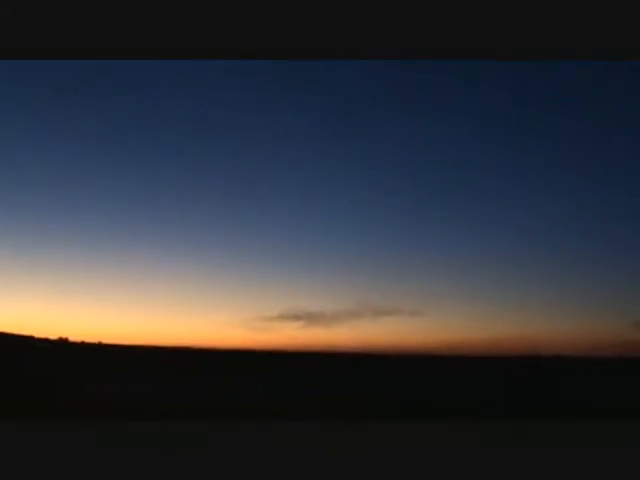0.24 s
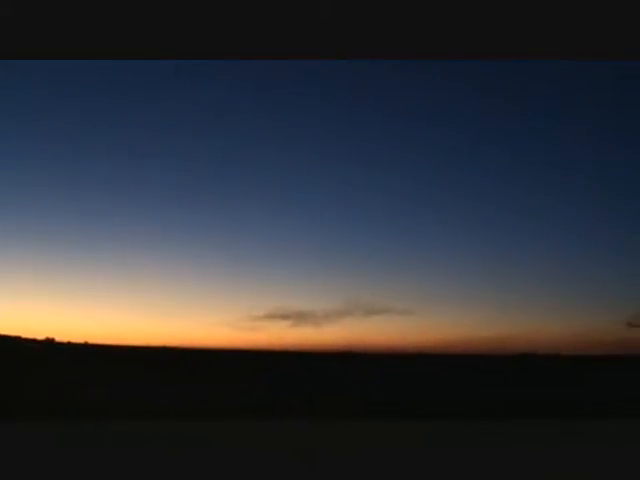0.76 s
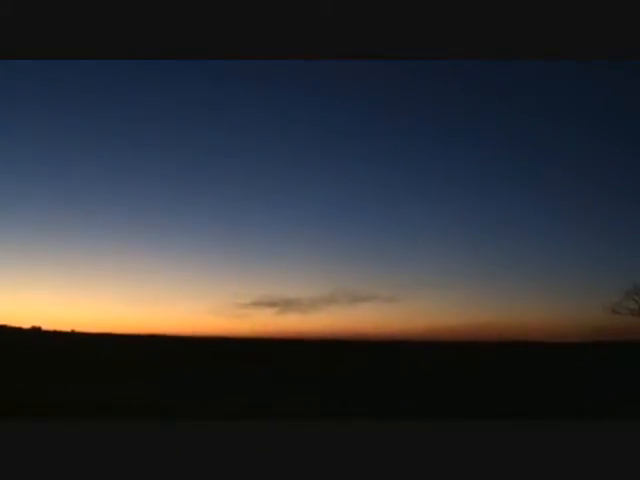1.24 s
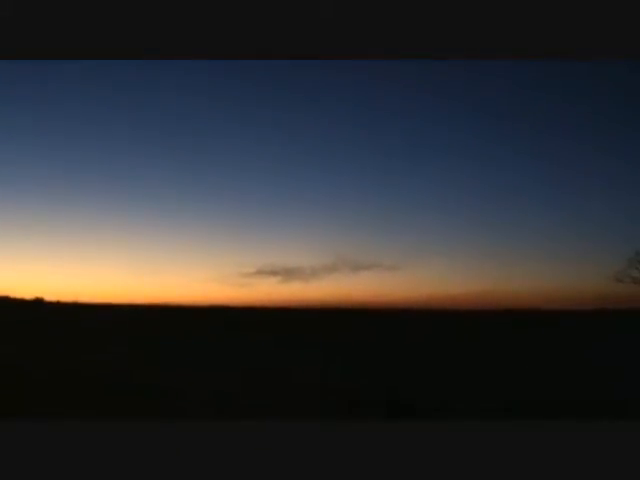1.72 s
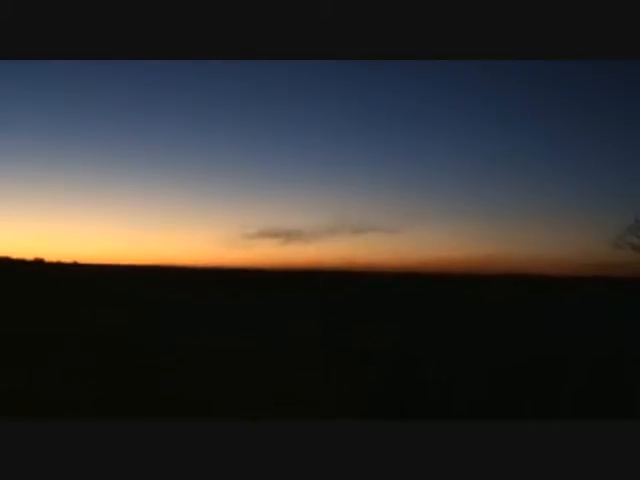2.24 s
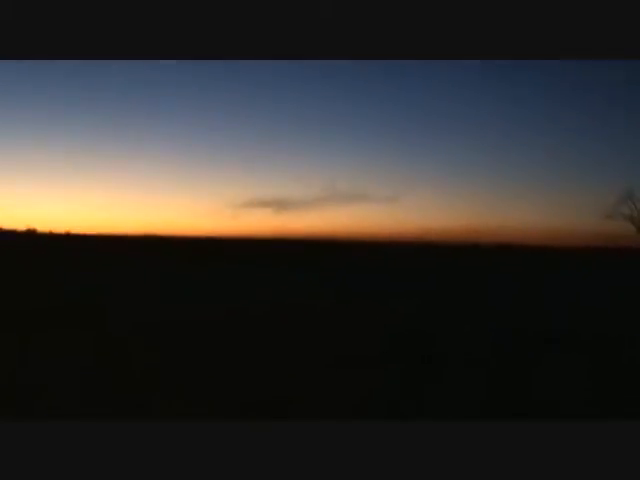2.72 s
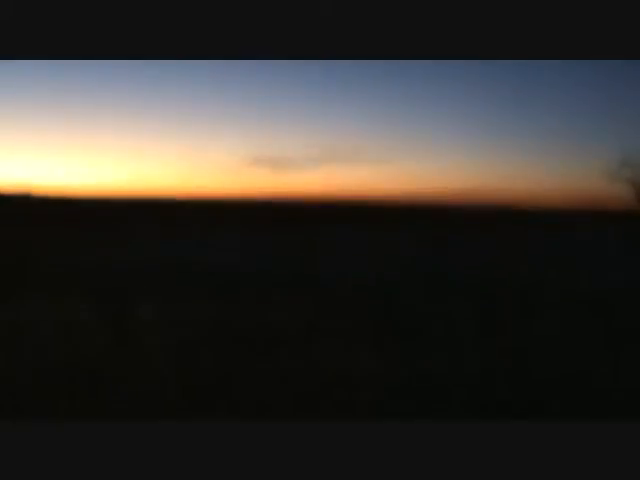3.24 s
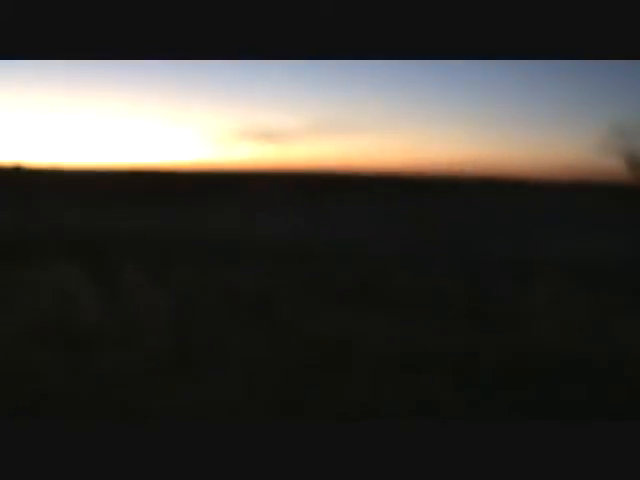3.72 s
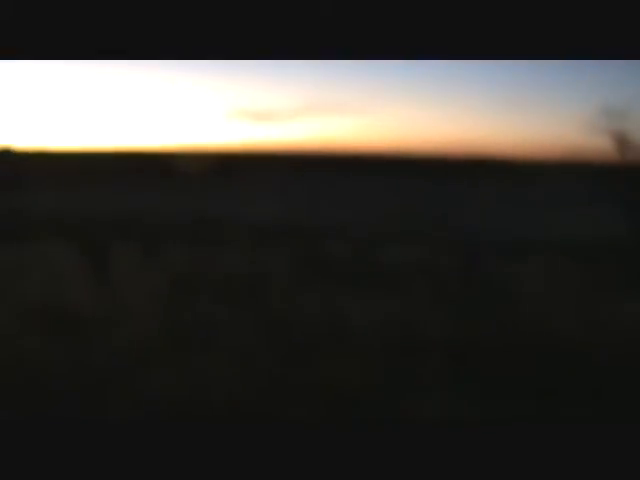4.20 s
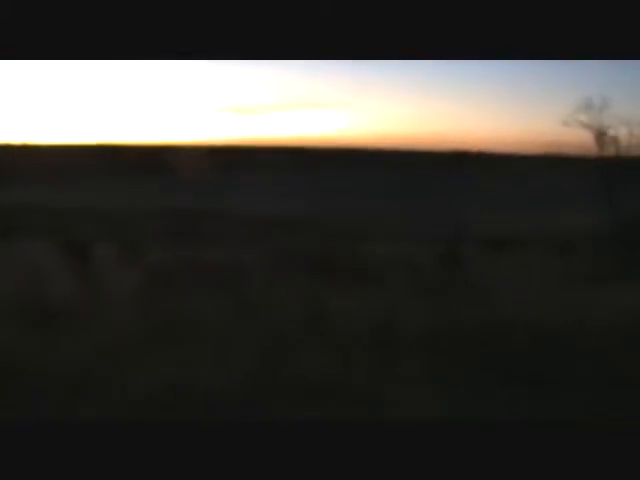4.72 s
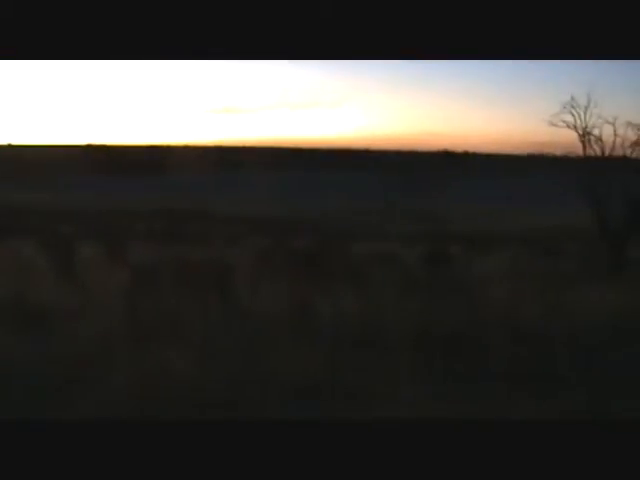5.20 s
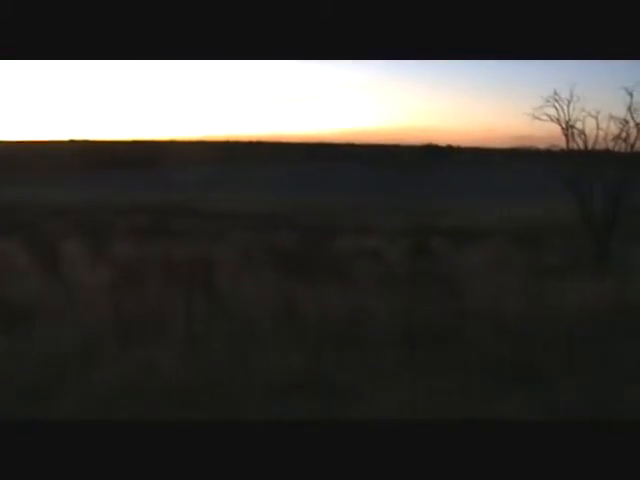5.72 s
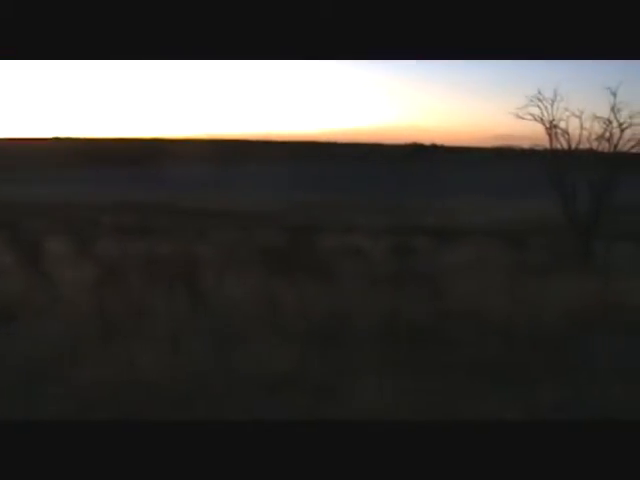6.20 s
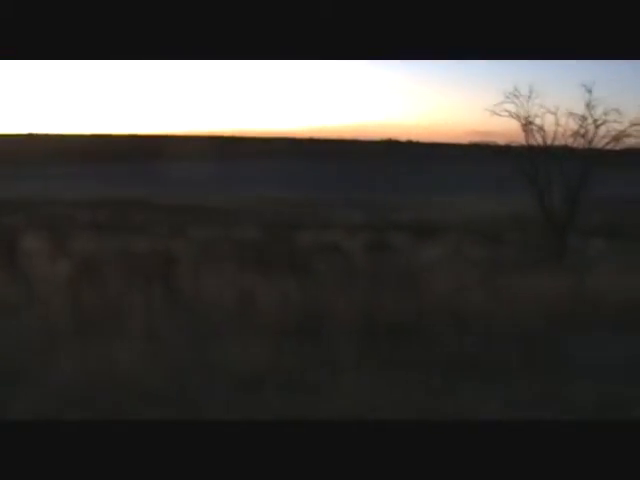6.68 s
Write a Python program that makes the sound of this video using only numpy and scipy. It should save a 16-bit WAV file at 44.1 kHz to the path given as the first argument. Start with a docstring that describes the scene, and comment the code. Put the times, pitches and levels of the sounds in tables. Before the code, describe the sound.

Close and distant geckos trade short, rattling chirp-like barks outdoors at dusk, the loudest on the left, with faint insects and quiet air behind.

```python
"""Barking geckos call from burrows on an open plain at dusk: three close, many further off.
Each bark is a quick run of 10-13 pulses ringing throat and burrow, then scattered by the ground.
Behind: bush crickets (stroke-modulated narrow resonance), air (shaped noise), a camera motor
(harmonics of its turn rate), handling bumps (noise swells) and short tones (gliding sines)."""
import sys
import numpy as np
from scipy import signal
from scipy.fft import rfft, irfft
from scipy.io import wavfile
from scipy.ndimage import uniform_filter1d

SR = 44100
rng = np.random.default_rng(int(sys.argv[2]) if len(sys.argv) > 2 else 0)


def pcm_store(signal):
    """Save signal as 16-bit PCM."""
    levels = np.round(np.clip(np.atleast_2d(signal), -1, 1) * 32767)
    wavfile.write(sys.argv[1], SR, levels.astype(np.int16).T)


N = 306495
TIME = np.arange(N) / SR


def undb(db):
    """Decibels to gain."""
    return 10 ** (np.asarray(db) / 20)


def unit(x):
    """Scale to rms 1."""
    return x / np.sqrt(np.mean(x ** 2))


def on_log(points, hz):
    """Read (f/Hz, value) points on a log-frequency axis."""
    f, value = np.transpose(points)
    return np.interp(np.log(np.maximum(hz, 1)), np.log(f), value)


def freqs(size):
    """Bin frequencies/Hz of a spectrum."""
    return np.arange(size // 2 + 1) * SR / size


def noise(gain):
    """Noise of rms 1 with the given gain per frequency bin."""
    return unit(irfft(rfft(rng.standard_normal(N)) * gain, N))


def band(centre_hz, width_hz):
    """Noise in a steep resonance."""
    f = freqs(N) + 1
    detune = (f * f - centre_hz * centre_hz) / (f * width_hz * 2)
    return noise(1 / (1 + detune ** 2 * 2))


def walk(rate_hz):
    """Slow random drift of rms near 1."""
    k = int(SR / rate_hz)
    steps = np.repeat(rng.standard_normal(N // k + 1), k)
    return unit(uniform_filter1d(steps, k)[:N])


def add(out, start_s, sound, pan_db):
    """Mix a sound into both channels; pan is left minus right."""
    i = max(int(start_s * SR), 0)
    part = sound[:max(N - i, 0)]
    out[:, i:i + len(part)] += undb(np.array([[pan_db], [-pan_db]]) / 2) * part


# hiss spectrum: f/Hz, relative density/dB
AIR_SPECTRUM = [(20, -36), (33, 0.5), (50, -6), (110, -5), (400, -4), (620, -7.5), (1000, -6), (2000, -7),
                (4000, -15), (7000, -16.5), (9500, -19.5), (11500, -21), (16000, -22.5)]
# left-right likeness of the hiss: f/Hz, correlation
AIR_LIKENESS = [(30, 1), (125, 0.91), (300, 0.5), (700, 0.04), (3000, 0.033), (8000, 0.49), (13000, 0.51)]
# rustle resonance: f/Hz, width/Hz
RUSTLE_BAND = (230, 240)


def air(level_db, rustle_db, unrest_db):
    """Even hiss, alike in both ears in the bass, with a low rustle that comes and goes."""
    f = freqs(N)
    gain = undb(on_log(AIR_SPECTRUM, f))
    alike = np.clip(on_log(AIR_LIKENESS, f), -1, 1)
    mid = irfft(rfft(rng.standard_normal(N)) * gain * np.sqrt(1 + alike), N)
    side = irfft(rfft(rng.standard_normal(N)) * gain * np.sqrt(1 - alike), N)
    hiss = undb(level_db) * unit(np.array([mid + side, mid - side]))
    shared, apart = band(*RUSTLE_BAND), band(*RUSTLE_BAND)
    rustle = shared + .5 * np.array([apart, -apart])
    return hiss + rustle * undb(rustle_db + unrest_db * walk(7))


MOTOR_TURN_HZ = 33.505
# motor lines, gaps interpolated: harmonic number, level/dB
MOTOR_LINES = [(22, -81), (24, -80), (27, -78), (29, -75), (30, -71), (31, -71), (33, -77), (34, -83),
               (36, -79), (37, -67.5), (38, -77), (39, -75), (40, -84), (44, -83)]


def motor(scatter_rad):
    """Camera motor ticks once a turn, so its harmonics throb together; speed wavers slightly."""
    order, db = np.transpose(MOTOR_LINES)
    turn = 2 * np.pi * np.cumsum(MOTOR_TURN_HZ * (1 + 0.00043 * walk(4.12))) / SR
    lines = 0
    for k in range(int(order[0]), int(order[-1]) + 1):
        phase = k * turn + scatter_rad * rng.standard_normal()
        lines = lines + undb(np.interp(k, order, db)) * np.cos(phase)
    return np.sqrt(2) * lines


TRILL_ATTACK_S, TRILL_RELEASE_S = 0.067, 0.47
# bush cricket trills: t/s, hold/s, level/dB, f/Hz
TRILLS = [(.95, .55, -64.5, 7920), (2.92, 0.68, -64.5, 8050), (4.0, 0.44, -62.5, 7980),
          (5.2, 0.75, -63, 7860), (6.4, 0.5, -63.5, 7930)]


def cricket(stroke_hz, width_hz, distant_db, distant_hz, distant_width_hz):
    """Wing strokes swell a narrow high resonance: trills build, hold, die over a distant shimmer."""
    strokes = 1 + .7 * np.cos(2 * np.pi * np.cumsum(stroke_hz * (1 + .002 * walk(3))) / SR)
    rasp = np.array([band(width_hz / 2, width_hz) + 1j * band(width_hz / 2, width_hz)
                     for _ in range(2)])
    voice = (rasp + 1) / np.sqrt(np.mean(np.abs(rasp + 1) ** 2))
    trills = 0
    for start, held, db, hz in TRILLS:
        age = np.maximum(TIME - start, 0)
        release = np.exp(-(np.maximum(age - held, 0) / TRILL_RELEASE_S) ** 2)
        swell = (1 - np.exp(-age / TRILL_ATTACK_S)) * release
        trills = trills + undb(db) * swell * np.exp(2j * np.pi * hz * TIME)
    distant = undb(distant_db) * np.array([band(distant_hz, distant_width_hz) for _ in range(2)])
    return distant + np.sqrt(2) * unit(strokes) * np.real(voice * trills)


BARK_SIZE = 2560  # samples
TIRING_DB = 0.27  # drop per bark within a bout


def throat(colour, count, sink, dull_db, fade_db):
    """Causal ring per pulse; positive sink, dull and fade lower, dull and weaken it towards the end."""
    f, spent = freqs(BARK_SIZE), np.linspace(0, 1, count)[:, None]
    db = on_log(colour, f * (1 + sink * spent ** 2))
    db = db - fade_db * np.sin(np.pi / 2 * spent ** 2)
    db = db - dull_db * spent * np.clip(np.log2((f + 1) / 4000), -1.5, 1)
    db = db - 5 * spent ** 6
    # folded cepstrum gives minimum phase
    cepstrum = irfft(np.log(undb(db)))
    cepstrum[:, 1:BARK_SIZE // 2] *= 2
    cepstrum[:, BARK_SIZE // 2 + 1:] = 0
    return np.exp(rfft(cepstrum))


def bark(rings, rate_hz, quicken, first_gap, jitter, rasp=0.56):
    """One run of pulses that speeds up and grows ragged; rms 1 over its first 20 ms."""
    f, spent = freqs(BARK_SIZE), np.linspace(0, 1, len(rings))
    chance = rng.standard_normal((len(rings), 2))
    pulse_rate_hz = rate_hz * (1 + quicken * np.sin(spent * np.pi / 2))
    gaps_s = (1 + jitter * spent * chance[:, 0]) / pulse_rate_hz
    gaps_s[0] *= first_gap
    delay = np.exp(-2j * np.pi * np.outer(np.cumsum(gaps_s) - gaps_s, f))
    # noise burst per pulse: makes the top treble hissy rather than clicky;
    # its lower part grows towards the bark's end
    age = TIME[:SR // 100]
    burst = unit(rng.standard_normal((len(rings), len(age))) * np.exp(-age / .0022))
    hiss = rfft(burst, BARK_SIZE) / np.sqrt(len(age))
    snap = 1 / np.sqrt(1 + (f / 6800) ** 10)
    pulses = snap + (rasp * spent[:, None] * snap + 1 - snap) * hiss
    strength = undb(2 * spent * chance[:, 1])[:, None]
    wave = irfft(np.sum(rings * pulses * delay * strength, axis=0))
    return wave / np.sqrt(np.mean(wave[:SR // 50] ** 2))


def ground(x, scatter_db, t60_s, plain_db, likeness):
    """Stones and grass scatter a short tail, the plain a faint long one; energy is unchanged."""
    t = TIME[:SR // 2]
    shared, left, right, *wide = rng.standard_normal((5, len(t)))
    likeness = np.clip(likeness, 0, 1)
    close = np.sqrt(likeness) * shared + np.sqrt(1 - likeness) * np.array([left, right])
    close = close * undb(-60 * t / t60_s) * (t > .001)
    distant = np.array(wide) * undb(-60 * t / 0.18) * (1 - np.exp(-t / .04))
    echo = (undb(scatter_db) * unit(close) + undb(plain_db) * unit(distant)) / np.sqrt(len(t))
    wet = x + signal.oaconvolve(x, echo, axes=1)[:, :N]
    return wet * np.std(x, axis=1, keepdims=True) / np.std(wet, axis=1, keepdims=True)


def gecko(barks, rings, quicken, first_gap, jitter, rasp):
    """One voice from its burrow mouth; barks: t/s, level/dB, pulse rate/Hz, left-right/dB."""
    out = np.zeros((2, N))
    for start, db, rate_hz, pan_db in barks:
        add(out, start, undb(db) * bark(rings, rate_hz, quicken, first_gap, jitter, rasp), pan_db)
    return out


def bout(first_s, last_s, count, slowing, level_db):
    """Barks come evenly, then lag and weaken as the animal tires: rows of t/s, level/dB."""
    gaps = 1 + slowing * np.linspace(0, 1, round(count) - 1) ** 3
    starts = first_s + (last_s - first_s) * np.append(0, np.cumsum(gaps)) / gaps.sum()
    return [(start, level_db - TIRING_DB * k) for k, start in enumerate(starts)]


def bouts(table, rate_hz, spread):
    """All barks of one voice, each near its own pulse rate: rows for gecko()."""
    rows = []
    for *run, pan_db in table:
        for start, db in bout(*run):
            rows.append((start, db, rate_hz * (1 + spread * rng.standard_normal()), pan_db))
    return rows


def close_bout(barks, level_db, pan_db):
    """Barks of a close animal, each a little weaker than the last: rows for gecko()."""
    return [(start, level_db - TIRING_DB * k, rate_hz, pan_db)
            for k, (start, rate_hz) in enumerate(barks)]


# crowd throat before pitch spread: f/Hz, level/dB
CROWD_THROAT = [(900, -48), (2200, -15), (3200, -10.5), (4100, -5), (4600, -5), (5500, -21.5), (8000, -35)]
# crowd swell, before gain and haze: t/s, level/dB
CROWD_LEVEL = [(0.0, -58), (1.66, -53), (4.8, -59.5), (5.13, -49), (5.65, -57), (6.12, -62), (6.44, -50.5),
               (6.95, -53.5)]


def crowd(gain_db, haze_db, haze_hz, haze_width_hz, count):
    """Many distant barks blurred by the ground; the furthest run together into a noise haze."""
    out = np.zeros((2, N))
    for k, (when, pitch, side) in enumerate(rng.uniform(-1, 1, (count, 3))):
        colour = np.array(CROWD_THROAT) * [1 + .1 * pitch, 1]
        rings = throat(colour, count=12, sink=0.042, dull_db=-1.5, fade_db=-4.5)
        call = bark(rings, rng.uniform(310, 500), 0.1475, 1, 0.101)
        add(out, (k + when / 2) / count * N / SR, call, 5 * side)
    wet = ground(out, scatter_db=1, t60_s=.11, plain_db=-5, likeness=.2)
    haze = np.array([band(haze_hz, haze_width_hz) for _ in range(2)]) * undb(2 * walk(15))
    level_db = np.interp(TIME, *np.transpose(CROWD_LEVEL)) + gain_db
    return (unit(wet) + undb(haze_db) * haze) * undb(level_db)


# far throat before scaling per animal: f/Hz, level/dB
FAR_THROAT = [(700, -24.5), (2100, -17), (3300, -11.5), (3900, -9.5), (4300, -2), (4700, -5), (6000, -15),
              (10000, -40)]
# far bouts: first t/s, last t/s, barks, last-gap excess/ratio, first-bark level/dB, left-right/dB,
# resonance f/Hz, sharpness (factor on throat dB)
FAR_BOUTS = [(0.164, 0.409, 2, 0, -45, -3, 4300, 1.36), (.632, 1.283, 4, .12, -50.5, 3, 4150, 1.45),
             (1.6786, 2.7628, 5, .17, -46, 5, 4480, 0.96), (1.823, 2.515, 4, .2, -43.5, -4, 4260, 0.95),
             (2.985, 4.0167, 7, .03, -50, 5, 4350, 1), (4.246, 4.4665, 2, 0, -44.5, -1.5, 4200, 1.1),
             (4.8, 5.168, 3, 0, -48, 0, 4380, 1.2), (4.957, 5.1884, 2, 0, -41, 1, 4230, 1.12),
             (6.161, 6.901, 4, .04, -43.5, 8.5, 4200, 2.1), (6.429, 6.844, 3, .05, -42.5, -1, 4230, 1.6)]


def far_geckos(centre_hz):
    """Neighbours further out, each with its own burrow pitch and sharpness of ring."""
    out = np.zeros((2, N))
    for *run, pan_db, hz, sharpness in FAR_BOUTS:
        colour = np.array(FAR_THROAT) * [hz / centre_hz, sharpness]
        rings = throat(colour, count=12, sink=.03, dull_db=6.5, fade_db=8)
        for start, db in bout(*run):
            call = bark(rings, rng.uniform(330, 460), 0.1173, 0.97, 0.075)
            add(out, start, undb(db) * call, pan_db)
    return out


CLOSE_RASP = .7  # noise burst share at bark end
# bright caller's barks: t/s, pulse rate/Hz
BRIGHT_BARKS = [(.2332, 369), (.4388, 314), (.6540, 323), (.8721, 322), (1.0934, 321.3), (1.3301, 320.7),
                (1.5978, 324.7)]
# bright throat and burrow: f/Hz, level/dB
BRIGHT_THROAT = [(300, -41), (750, -23.5), (1400, -21.5), (2000, -10.5), (2500, -14), (3300, -6),
                 (4000, 1.5), (4450, 0), (4790, 10), (5050, 2), (5800, -2.5), (7200, -15), (10000, -30.5),
                 (15000, -59)]


def bright_gecko():
    """Close caller, near centre: pulses ring a bright throat and burrow."""
    rings = throat(BRIGHT_THROAT, count=13, sink=0.023, dull_db=8, fade_db=8.0)
    barks = close_bout(BRIGHT_BARKS, level_db=-22.0, pan_db=-0.6)
    return gecko(barks, rings, quicken=.3, first_gap=0.9, jitter=0.043, rasp=CLOSE_RASP)


# bumps, rustles, ticks: t/s, peak level/dB, f/Hz, width/Hz, rise/s
BUMPS = [(.95, -61.5, 230, 243, 0.062), (1.847, -48.5, 3500, 4970, 0.0026), (1.97, -62, 230, 240, 0.27),
         (3.211, -58, 160, 158, 0.032), (3.379, -55, 735, 500, 0.022), (3.362, -52, 125, 90, 0.032),
         (3.88, -64, 230, 240, .12), (4.468, -56, 260, 253, 0.021), (5.34, -61.5, 260, 240, 0.045),
         (6.247, -55.5, 101, 39.3, 0.021)]


def bumps():
    """Brief swells of band noise as the camera is handled."""
    out = 0
    for start, db, hz, width, rise in BUMPS:
        age = np.maximum(TIME - start, 0) / rise
        out = out + undb(db) * age * np.exp(1 - age) * band(hz, width)
    return out


# midfield bouts: first t/s, last t/s, barks, last-gap excess/ratio, first-bark level/dB, left-right/dB
MIDFIELD_BOUTS = [(1.4356, 2.394, 5, 0.19, -41.5, -5.5), (2.6254, 3.4351, 5, .18, -44.5, -6.5),
                  (6.1691, 6.9338, 5, .08, -41, -9)]
# midfield throat and burrow: f/Hz, level/dB
MIDFIELD_THROAT = [(600, -39), (1400, -18.5), (2200, -9.5), (3200, -4), (3950, 5.5), (4500, -12),
                   (6000, -17), (10000, -43)]


def midfield_gecko():
    """Caller off to the right: raspy pulses ring its throat and burrow."""
    rings = throat(MIDFIELD_THROAT, count=10, sink=0.034, dull_db=7, fade_db=11.5)
    barks = bouts(MIDFIELD_BOUTS, rate_hz=348, spread=.01)
    return gecko(barks, rings, quicken=.1, first_gap=0.99, jitter=0.063, rasp=0.91)


# thin whistles, low blip: t/s, level/dB, f/Hz, length/s, glide/ratio, octave re tone/dB
CHIRPS = [(3.042, -56.5, 3240, 0.18, -0.017, -2.5), (3.40, -56.5, 5330, 0.142, -0.038, -25),
          (5.7512, -32, 880, 0.0064, .08, -14.5)]


def chirps():
    """Short rounded gliding tones, each with its octave."""
    out = 0
    for start, db, hz, length, glide, octave_db in CHIRPS:
        u = np.clip((TIME - start) / length, 0, 1)
        phase = 2 * np.pi * hz * length * (u + glide * u * u / 2)
        tone = np.sin(phase) + undb(octave_db) * np.sin(2 * phase)
        out = out + undb(db) * np.sin(np.pi * u) * tone
    return out


# piping bouts: first t/s, last t/s, barks, last-gap excess/ratio, first-bark level/dB, left-right/dB
PIPING_BOUTS = [(3.3858, 4.1735, 4, .16, -49.5, 5), (4.556, 5.0846, 3, .04, -46.5, -2.5)]
# piping throat and burrow: f/Hz, level/dB
PIPING_THROAT = [(1500, -21), (3800, -26), (4600, -8), (5000, -7), (5400, -11), (6200, -37), (9000, -60)]


def piping_geckos():
    """Small distant geckos: pulses ring a higher, piping throat."""
    rings = throat(PIPING_THROAT, count=12, sink=.02, dull_db=-0.5, fade_db=9.5)
    barks = bouts(PIPING_BOUTS, rate_hz=430, spread=.01)
    return gecko(barks, rings, quicken=0.097, first_gap=0.99, jitter=0.088, rasp=0.87)


# soft caller's barks: t/s, pulse rate/Hz
SOFT_BARKS = [(4.3103, 485), (4.5112, 504.6), (4.7127, 481), (4.9182, 480), (5.1290, 474), (5.3566, 475)]
# soft throat and burrow: f/Hz, level/dB
SOFT_THROAT = [(300, -43), (800, -25), (1500, -20), (2500, -11), (3300, -6.5), (3900, 4), (4280, 8),
               (4600, -3.5), (5500, -13), (7000, -18.5), (10000, -35), (15000, -50)]


def soft_gecko():
    """Softer close caller: fast pulses at a nearly steady rate."""
    rings = throat(SOFT_THROAT, count=12, sink=.01, dull_db=8, fade_db=0.5)
    barks = close_bout(SOFT_BARKS, level_db=-29.5, pan_db=-1.0)
    return gecko(barks, rings, quicken=0.018, first_gap=0.87, jitter=0.078, rasp=CLOSE_RASP)


# near caller's barks: t/s, pulse rate/Hz
NEAR_BARKS = [(5.0255, 452), (5.2318, 362), (5.4321, 348), (5.6363, 318.5), (5.8387, 318), (6.0409, 321),
              (6.2529, 313.5), (6.4799, 328.6)]
# near throat and burrow: f/Hz, level/dB
NEAR_THROAT = [(300, -34), (800, -33), (1400, -23.5), (1900, -15), (2700, -12), (3400, -4), (3950, 5),
               (4350, 3), (4750, -11.5), (5700, -9), (7200, -24), (10000, -34.5), (15000, -73)]


def near_gecko():
    """Loudest close caller, to the left: short runs of quickening pulses."""
    rings = throat(NEAR_THROAT, count=10, sink=0.012, dull_db=6.5, fade_db=7.0)
    barks = close_bout(NEAR_BARKS, level_db=-20.0, pan_db=6.5)
    return gecko(barks, rings, quicken=0.1398, first_gap=.77, jitter=0.039, rasp=CLOSE_RASP)


def scene():
    """Close callers, wider colony, small sounds and the evening background."""
    background = air(level_db=-55.0, rustle_db=-75, unrest_db=3) + motor(scatter_rad=.7)
    background += cricket(stroke_hz=134.8, width_hz=260,
                          distant_db=-69, distant_hz=7900, distant_width_hz=400)
    colony = crowd(gain_db=.5, haze_db=-3.5, haze_hz=3990, haze_width_hz=500, count=110)
    colony += ground(far_geckos(centre_hz=4410) + piping_geckos(),
                     scatter_db=-3.0, t60_s=0.16, plain_db=-27, likeness=0.64)
    colony += ground(bright_gecko(), scatter_db=-5, t60_s=.095, plain_db=-30, likeness=.35)
    colony += ground(midfield_gecko(), scatter_db=-1.5, t60_s=0.074, plain_db=-22, likeness=0.92)
    colony += ground(soft_gecko(), scatter_db=-6, t60_s=.11, plain_db=-22, likeness=.35)
    colony += ground(near_gecko(), scatter_db=-6.5, t60_s=.12, plain_db=-32, likeness=.25)
    return colony + chirps() + bumps() + background


TOP_HZ = 16000


def record(dry):
    """Recorder cuts the top: steep elliptic low-pass."""
    return signal.sosfilt(signal.ellip(10, .2, 70, TOP_HZ, fs=SR, output="sos"), dry)


dry = scene()
out = record(dry)
pcm_store(out)
```